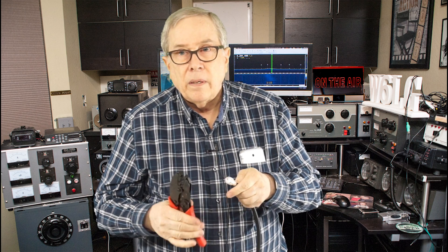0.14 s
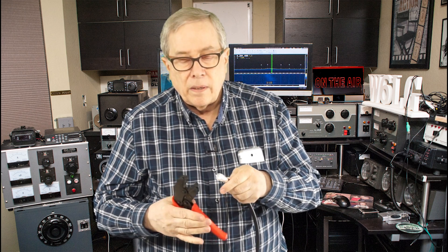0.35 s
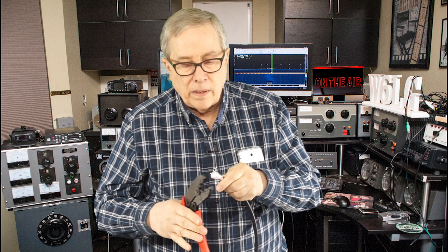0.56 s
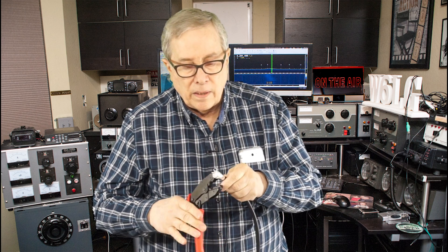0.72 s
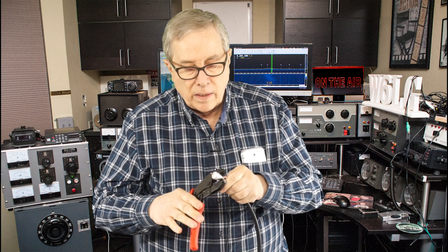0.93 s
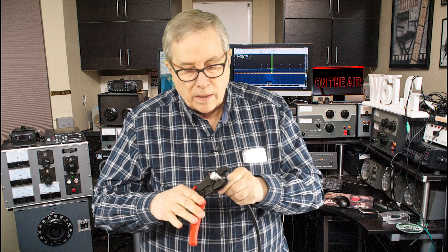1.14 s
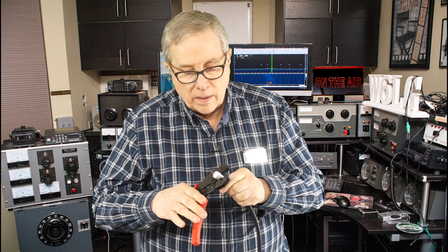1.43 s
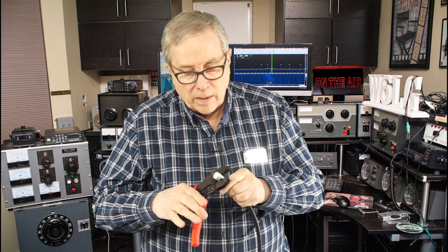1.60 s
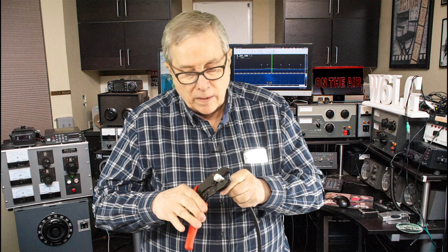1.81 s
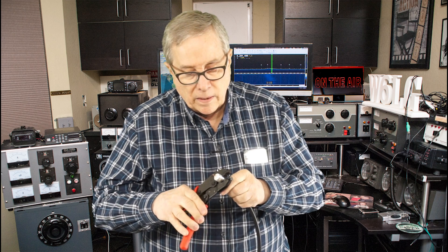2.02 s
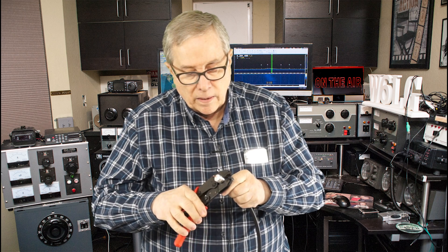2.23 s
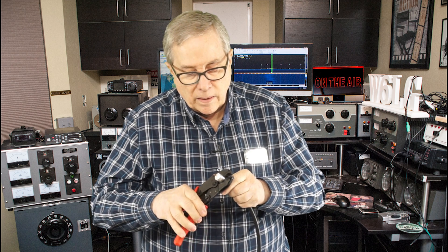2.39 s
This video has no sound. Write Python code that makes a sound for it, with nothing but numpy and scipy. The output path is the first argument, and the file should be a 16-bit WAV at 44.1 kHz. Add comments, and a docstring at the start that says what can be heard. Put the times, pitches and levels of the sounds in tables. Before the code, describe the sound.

A hand crimping tool's ratchet snaps loudly in two quick bursts, then small metal ticks and knocks

```python
"""A steel crimping tool in a small furnished workroom: the tail of one snap dies, the pivot grates, then the ratchet
lets go in two overloading runs of snaps (short noise bursts) and the steel rings on (long, wavering sines).
A connector is then seated in the jaws with knocks, small ticks (short rings) and low bumps, ending in faint snaps.
Hands and sleeves rustle over a quiet hiss, both of banded noise. The snaps, grating, knocks and ticks return
once from a near surface and in a short room tail."""
import sys
import numpy as np
from scipy import signal
from scipy.fft import rfft, irfft
from scipy.io import wavfile

SR = 44100
rng = np.random.default_rng(int(sys.argv[2]) if len(sys.argv) > 2 else 0)


def put_to_file(sound):
    """Save the sound as 16-bit audio at rate SR, in the file named by the first command-line argument."""
    columns = np.atleast_2d(sound).T  # one column per channel
    safe = np.clip(columns, -1, 1)
    whole_steps = np.round(safe * 32767)
    wavfile.write(sys.argv[1], SR, whole_steps.astype(np.int16))


def boost_factor(decibels):
    """Convert a level in decibels to a linear amplitude factor."""
    exponent = np.asarray(decibels, float) / 20
    return 10 ** exponent


N = 112454   # samples heard
LEAD_S = .1   # extra time before the start, cut off at the end
L = N + int(LEAD_S * SR)


def rms_one(x):
    """Scale to unit rms."""
    return x / np.sqrt(np.mean(x ** 2) + 1e-20)


def at_hz(points, hz):
    """Read a table on a log-frequency axis."""
    table_hz, value = np.array(points).T
    return np.interp(np.log(hz), np.log(table_hz), value)


def place(s):
    """Sample index of a time."""
    return int((s + LEAD_S) * SR)


def drift(rate):
    """Slow random wandering of spread 1, made by smoothing noise; a higher rate [Hz] wanders faster."""
    r = np.exp(-80 * np.pi * rate / SR)   # one slow value every 40 samples
    noise = rng.standard_normal(L // 40 + 2002)
    slow = signal.lfilter([1], [1, -2 * r, r * r], noise)[2000:]   # skip the settling
    return np.interp(np.arange(L) / 40, np.arange(len(slow)), rms_one(slow))


def ring(x, hz, t60):
    """A resonance: a unit click sets off a sine of height 1 that falls by 60 dB in t60 seconds."""
    r, w = boost_factor(-60 / (t60 * SR)), 2 * np.pi * hz / SR
    return signal.lfilter([0, np.sin(w)], [1, -2 * r * np.cos(w), r * r], x + 1e-18)


def bands():
    """Half-octave filters with their centres."""
    edges = 20 * 2 ** np.arange(0, 9.8, .5)
    return [(np.sqrt(a * b), signal.butter(2, [a, b], "band", fs=SR, output="sos"))
            for a, b in zip(edges, edges[1:])]


def banded_noise(spectrum, patchy_db, rate):
    """Noise of unit rms whose bands flicker partly together, partly alone."""
    white, together = rng.standard_normal((2, L)), drift(rate)
    total = np.zeros(L)
    for k, (hz, sos) in enumerate(bands()):
        flicker_db = patchy_db * (0.44 * together + drift(2 * rate))
        # neighbouring bands take turns with two separate noises
        total += boost_factor(at_hz(spectrum, hz) + flicker_db) * signal.sosfilt(sos, white[k % 2])
    return rms_one(total)


def causal(gain_db):
    """Minimum-phase response of a dB curve: the filter acts as early as it can, with nothing before a hit."""
    cep = irfft(gain_db * np.log(10) / 20)
    cep[1:len(cep) // 2] *= 2
    cep[len(cep) // 2 + 1:] = 0
    return np.exp(rfft(cep))


def hiss():
    """A steady, quiet noise with a gentle flicker in its bands."""
    # colour of the hiss: (frequency [Hz], density [dB per Hz])
    hiss_colour = [(15, -31), (25, -1.5), (53, -10.5), (579, -8), (735, -10.5), (1130, -11), (2940, -13.5),
                   (8980, -16.5), (13400, -16.5), (14500, -24)]
    return boost_factor(-65) * banded_noise(hiss_colour, .5, rate=4.0)


def rustle():
    """Cloth and skin rub as flickering noise, whose level and brightness follow the moving hands and sleeves."""
    # movement of hands and sleeves: (time [s], level [dB], treble lift [dB])
    movement = [(0, -45, 1), (0.138, -60, 3), (.38, -53.5, 3.5), (.56, -50, -4), (.64, -59.5, 1.5),
                (0.852, -60, -3.5), (.95, -54, -4.5), (1.098, -53, -2.5), (1.199, -59.5, 1.5),
                (1.299, -53, -3.5), (1.42, -66.5, 3), (1.5, -62, -5), (1.7, -73.5, 3), (1.92, -74, -4),
                (2.101, -78.5, 0), (2.3, -78, 4), (2.45, -69.5, -0.5), (2.55, -63.5, -6)]
    # colour of the cloth: (frequency [Hz], density [dB per Hz])
    cloth_colour = [(40, -40.5), (120, -15), (300, -7), (550, -2), (900, -5), (1300, -9.5), (2500, -8.5),
                    (5000, -11.5), (9000, -6.5), (13500, -19)]
    treble_from_hz = 2300
    s, db, lift_db = np.transpose(movement)
    t = np.arange(L) / SR - LEAD_S
    cloth = banded_noise(cloth_colour, 0.96, rate=14.0)
    treble = signal.sosfilt(signal.butter(2, treble_from_hz, "high", fs=SR, output="sos"), cloth)
    dull = signal.sosfilt(signal.butter(2, treble_from_hz, fs=SR, output="sos"), cloth)
    # the minus sign lets the two halves join without a notch
    return boost_factor(np.interp(t, s, db)) * (dull - boost_factor(np.interp(t, s, lift_db)) * treble)


def bumps():
    """Each bump of the body or cable is a soft push that rings low and briefly."""
    # low bumps: (time [s], level [dB])
    pushes = [(0.418, -64), (.54, -65), (.925, -64), (1.43, -67), (1.936, -69), (2.441, -73)]
    hz, t60_s = 115, 0.08
    clicks = np.zeros(L)
    for s, db in pushes:
        clicks[place(s)] = boost_factor(db)
    softened = ring(clicks, hz, t60_s / 2)
    return ring(softened, hz, t60_s) * 2 * np.pi * hz / SR


def knocks():
    """Soft, scuffing contacts of the cable and grip strike a short mid ring and a hollow thud."""
    # dull knocks: (time [s], level of the 2 kHz ring [dB], level of the hollow thud [dB])
    contacts = [(.44, -68, -51), (0.549, -63, -55), (.9617, -29, -49), (.9688, -29, -52), (.979, -35, -56),
                (1.036, -53, -50), (1.235, -49, -50.5), (1.258, -45, -54), (1.297, -72, -59),
                (1.60, -58, -62), (1.63, -72, -62), (1.91, -66.5, -63)]
    # resonances of the mid ring: (frequency [Hz], level [dB], t60 [s])
    mid_modes = [(2140, 0.5, 0.0071), (1790, -29, 0.012), (2900, -3, 0.0056)]
    # resonances of the hollow thud: (frequency [Hz], level [dB], t60 [s])
    thud_modes = [(539, 2, 0.12), (817, -1, 0.15), (370, -3, 0.021), (635, 5, 0.035)]
    decay_ms = 1.2   # time constant of the scuff
    out, t = np.zeros(L), np.arange(1024) / SR
    for column, modes in ((1, mid_modes), (2, thud_modes)):
        contact = np.zeros(L)
        scuffs = rng.standard_normal((len(contacts), len(t))) * np.exp(-1000 * t / decay_ms)
        for row, scuff in zip(contacts, scuffs):
            start = place(row[0])
            contact[start:start + len(t)] += boost_factor(row[column]) * scuff / np.sqrt(np.sum(scuff ** 2))
        for hz, level_db, t60 in modes:
            near_mode = signal.butter(1, [hz / 1.5, hz * 1.5], "band", fs=SR, output="sos")
            out += boost_factor(level_db) * ring(signal.sosfilt(near_mode, contact), hz, t60)
    return out


def ticks():
    """The connector ticks against the jaws: a noisy crack and a brief ring at one low and one high resonance."""
    # ticks: (time [s], level [dB], low resonance [Hz], high resonance against low [dB], crack [dB])
    contacts = [(0.519, -51, 6560, -27, 5), (0.723, -55, 2800, -36, 3), (1.0224, -31, 2900, 5, 16),
                (1.0256, -38, 4600, -10, 12), (1.034, -46, 4700, -10, 16), (1.049, -45, 7240, -4, 11),
                (1.1195, -33, 4100, -2, 4), (1.2453, -31, 4170, -12, 9), (1.255, -48, 4540, -10, 15),
                (1.2968, -52, 4000, 15, 2), (1.315, -62, 4040, 21, 6), (1.408, -64, 3980, 10, 6),
                (1.599, -54, 2523, -20, 4), (2.161, -58, 1546, -18, 11), (2.2415, -52, 4300, -20, 11)]
    high_hz, crack_ms = 10700, .8   # crack_ms is a time constant
    low_t60_s, high_t60_s = .008, .003
    out, t = np.zeros(L + 2048), np.arange(2048) / SR
    noises = rng.standard_normal((len(contacts), len(t)))
    for (s, db, low_hz, high_db, crack_db), noise in zip(contacts, noises):
        crack_band = signal.butter(3, [low_hz / 2, 11800], "band", fs=SR, output="sos")
        crack = signal.sosfilt(crack_band, noise * np.exp(-1000 * t / crack_ms))
        click = signal.sosfilt(signal.butter(1, low_hz / 2, "high", fs=SR, output="sos"), t == 0)
        tick = ring(click, low_hz, low_t60_s) - boost_factor(high_db) * ring(click, high_hz, high_t60_s)
        tick = tick + boost_factor(crack_db) * crack / np.sqrt(np.sum(crack ** 2))
        out[place(s):place(s) + len(t)] += boost_factor(db) * tick
    return out[:L]


def grate():
    """As the handles start to part, dense slips in the pivot drive three short resonances."""
    # resonances of the pivot: (frequency [Hz], level [dB], t60 [s])
    pivot_modes = [(1550, 0, .012), (2850, -1, .008), (3500, -3, .006)]
    start_s, length_s, level_db = .185, .022, -41
    slips, count = np.zeros(L), int(length_s * SR)
    slips[place(start_s):place(start_s) + count] = rng.standard_normal(4096)[:count]
    sound = sum(boost_factor(db) * ring(slips, hz, t60) / np.sqrt(t60) for hz, db, t60 in pivot_modes)
    return boost_factor(level_db) * sound / np.sqrt(np.sum(sound ** 2) / count)


def steel():
    """Thin modes ring after three blows, wavering as the tool turns in the hand, until the hand damps them."""
    # modes of the steel: (frequency [Hz])
    mode_hz = [1007, 2017, 3965, 4725, 4811, 5230, 5568, 5940, 7765, 7978, 8123, 8156, 8823, 9102, 9582,
               9846, 11300]
    # for each mode: (t60 [s], level struck shut [dB], struck open [dB], struck at the jaw [dB])
    mode_levels = [(1.7, -52, -83.5, -95), (1.99, -81, -50.5, -99), (0.86, -59, -53.5, -67),
                   (0.82, -42, -62, -64), (2.1, -61, -51, -85), (.1, -60, -52, -51), (.4, -54, -58.5, -72),
                   (0.43, -63.5, -55.5, -63), (.25, -52.5, -52, -66), (0.16, -63.5, -52, -66),
                   (0.95, -66.5, -42.5, -60), (0.21, -34.5, -42.5, -77), (1.2, -74, -57.5, -85),
                   (1.8, -73, -47, -81), (0.46, -48.5, -51, -79), (0.2, -59, -48.5, -53),
                   (0.22, -69, -53, -78)]
    # blows in the order shut, open, at the jaw: (time [s])
    struck_s = [-.03, .317, 2.331]
    # when the hand starts to damp each blow's ring: (time [s])
    gripped_s = [.11, .72, 2.36]
    grip_t60_s = .4   # extra fall once gripped
    waver_db, waver_per_s = 2.5, 9
    out, t = np.zeros(L), np.arange(L) / SR - LEAD_S
    wavers = [boost_factor(waver_db * drift(waver_per_s)) for hz in mode_hz]
    for k, (struck, gripped) in enumerate(zip(struck_s, gripped_s)):
        click = np.zeros(L)
        click[place(struck)] = 1
        free = sum(boost_factor(levels[k]) * waver * ring(click, hz, t60)
                   for hz, (t60, *levels), waver in zip(mode_hz, mode_levels, wavers))
        out += free * boost_factor(-60 * np.maximum(t - gripped, 0) / grip_t60_s)
    return out


def snaps():
    """Each ratchet snap is a brief chatter of steel on steel, coloured by the tool; loose parts rattle on."""
    # snaps: (time [s], level [dB], brightest frequency [Hz], contact [ms], chatter falls to 1/e in twice this)
    releases = [(-.03, -6.5, 7540, 0.71), (0.1662, -19, 6930, 0.7), (0.1849, -38.5, 5004, 6.0),
                (.2035, -24, 3993, 3.7), (0.2064, 6, 7000, .9), (0.2124, 6, 5863, 1.04),
                (0.2173, 6.5, 7512, 1.27), (0.2222, 0, 6500, 0.95), (0.2287, -4.5, 6905, 1.2),
                (0.2346, 8.5, 8483, 0.37), (.2400, -5.5, 6000, 0.54), (0.2999, -26.5, 6000, 3.0),
                (.3040, 5, 6385, 1.1), (0.3179, 5.5, 7500, 0.83), (.3300, -2.5, 8575, .5),
                (0.3364, -9.5, 5870, 1.4), (.3480, -10, 6080, 0.55), (2.3303, -46, 5130, 4.4),
                (2.3410, -49, 4050, 2.4)]
    # colour of the tool: (frequency [Hz], density [dB per Hz])
    tool_colour = [(24, -56), (40, -23.5), (942, -22), (1520, -9), (2260, -12), (3560, -2), (4130, -6),
                   (7930, -2.5), (12500, -10), (16000, -43)]
    peak_db, peak_octaves = 3.5, .4   # lift around the brightest frequency
    rattle_db, rattle_ms = -18.5, 5   # start against the chatter, time constant
    size = 4096
    out = np.zeros(L + size)
    t, hz = np.arange(size) / SR, np.arange(size // 2 + 1) * SR / size + 1
    noises = rng.standard_normal((len(releases), size))
    for (s, db, bright_hz, ms), noise in zip(releases, noises):
        peak = np.exp(-.5 * (np.log2(hz / bright_hz) / peak_octaves) ** 2)
        colour = causal(at_hz(tool_colour, hz) + peak_db * peak)
        chatter = np.exp(-(500 * t / ms) ** 2)
        rattle = boost_factor(rattle_db) * np.exp(-1000 * t / rattle_ms)
        burst = irfft(rfft(noise * (chatter + rattle)) * colour)
        loudness = 2 * np.sqrt(np.sum(burst ** 2) / (ms * SR / 1000))
        out[place(s):place(s) + size] += boost_factor(db) * burst / loudness
    return out[:L]


def room(x):
    """Adds one near echo and a diffuse tail of noise that dies band by band."""
    # how long the room rings: (frequency [Hz], t60 [s])
    room_t60 = [(200, 0.076), (700, 0.14), (1300, 0.13), (2000, 0.15), (5000, 0.15), (9000, .18),
                (14000, 0.11)]
    # colour of the tail at its start: (frequency [Hz], level [dB])
    room_tilt = [(200, -17), (700, -7.5), (1300, -3), (3000, 3), (8000, -0.5), (11500, -0.5), (14000, -7.5)]
    tail_db, start_s, rise_s = -7, 0.0037, 0.01
    echo_s, echo_db = .0054, -5.5
    t = np.arange(int(.6 * SR)) / SR
    white = rng.standard_normal((2, len(t)))
    tail = np.zeros(len(t))
    for k, (hz, sos) in enumerate(bands()):
        fall_db = 60 * t / at_hz(room_t60, hz)
        tail += boost_factor(at_hz(room_tilt, hz) - fall_db) * signal.sosfilt(sos, white[k % 2])
    tail *= np.clip((t - start_s) / rise_s, 0, 1)
    response = boost_factor(tail_db) * tail / np.sqrt(np.sum(tail ** 2))
    response[0] += 1   # the direct sound
    response[int(echo_s * SR)] += boost_factor(echo_db)
    return signal.fftconvolve(x, response)[:L]


def scene():
    """Clicks in the room and ringing steel, over bumps, rustle and hiss."""
    clicks = room(snaps() + ticks() + knocks() + grate())
    mix = clicks + steel() + bumps() + rustle() + hiss()
    return mix[None, L - N:]


def top_cut(x):
    """Nothing passes above the cut-off."""
    return signal.sosfilt(signal.butter(12, 16610, fs=SR, output="sos"), x)


def record(dry):
    """The top is cut, the input bends smoothly into overload on loud peaks, and the treble is softened."""
    cut_hz, soften_hz = 13950, 14500
    overload, hardness = .62, 6.0   # ceiling of the wave, sharpness of the bend
    cut = signal.sosfilt(signal.ellip(10, .5, 55, cut_hz, fs=SR, output="sos"), dry)
    clipped = cut / (1 + np.abs(cut / overload) ** hardness) ** (1 / hardness)
    softened = signal.sosfilt(signal.butter(4, soften_hz, fs=SR, output="sos"), clipped)
    return top_cut(softened)


dry = scene()
out = record(dry)
put_to_file(out)
```